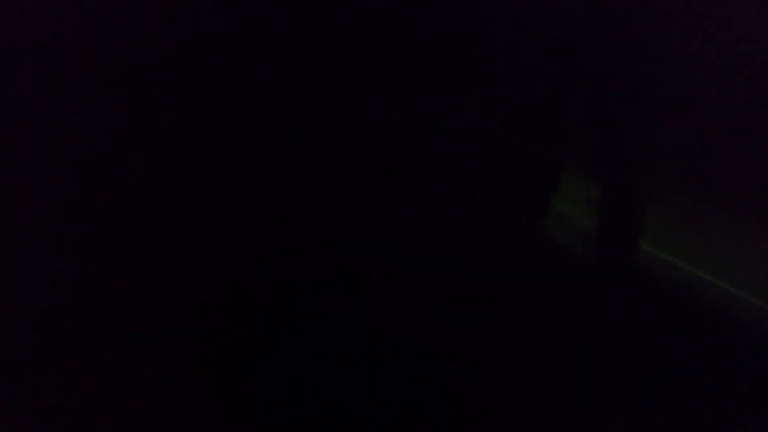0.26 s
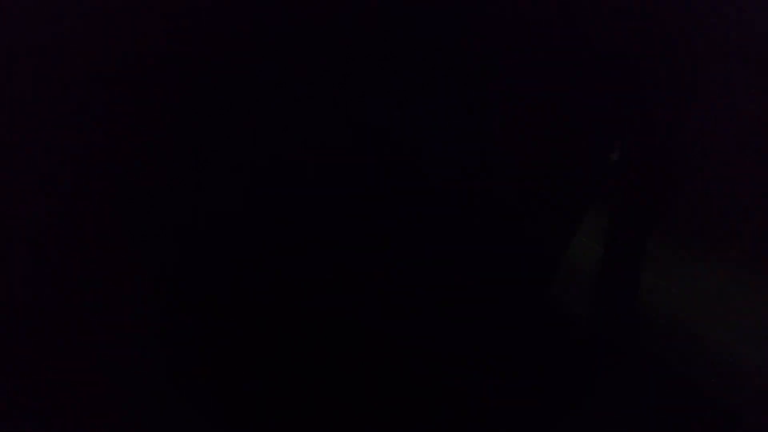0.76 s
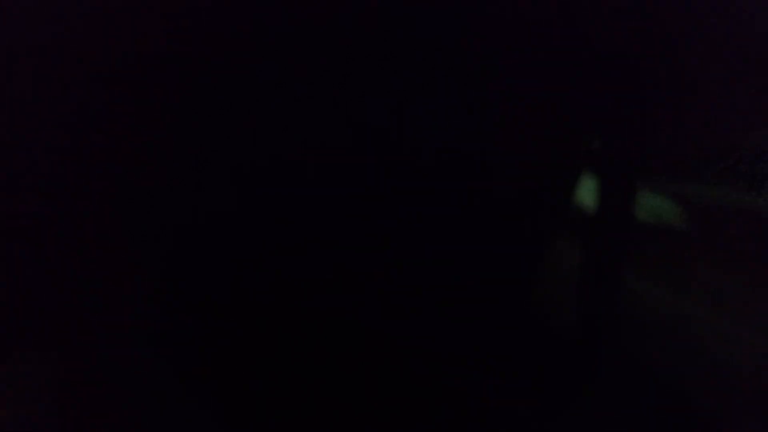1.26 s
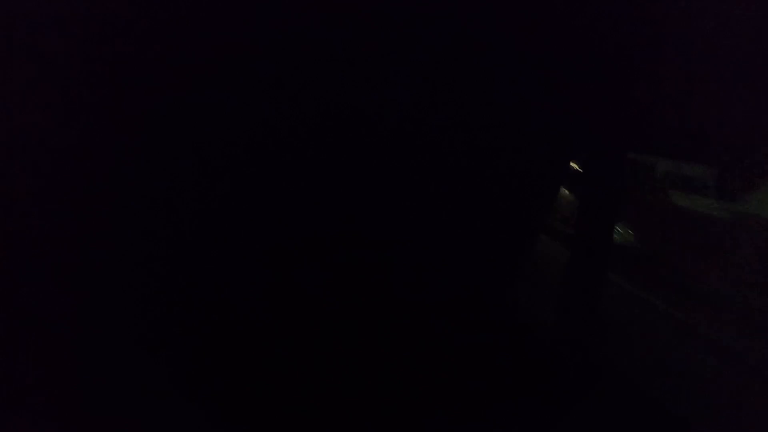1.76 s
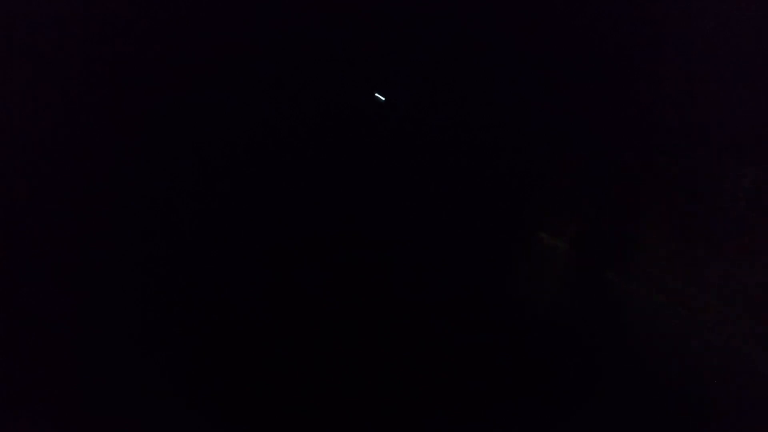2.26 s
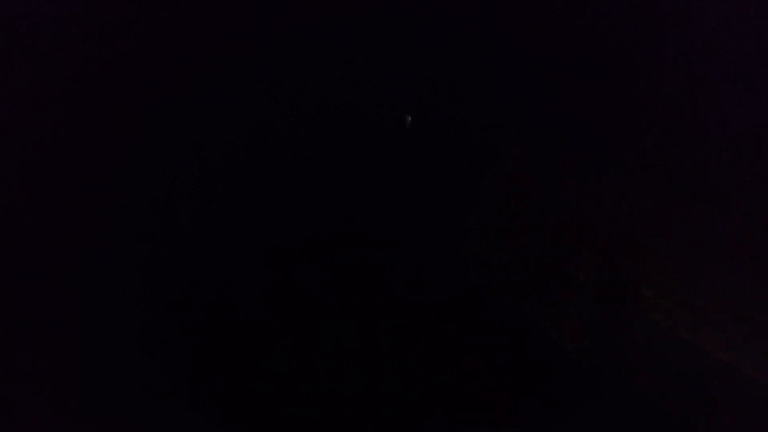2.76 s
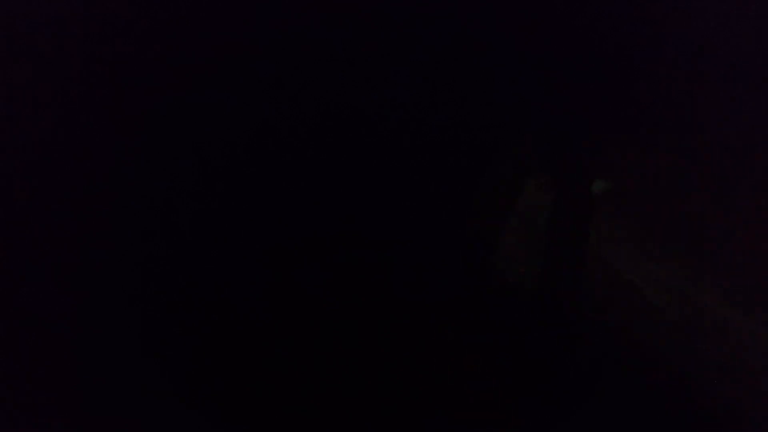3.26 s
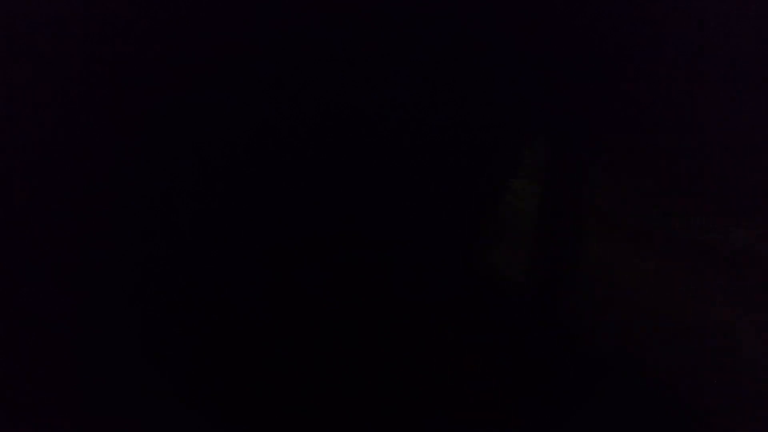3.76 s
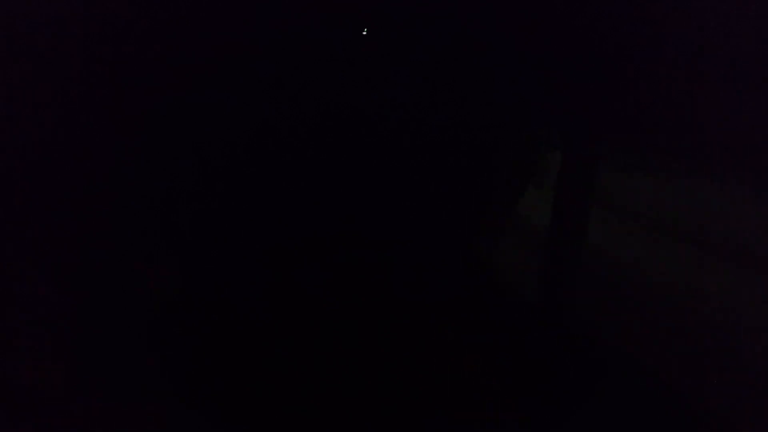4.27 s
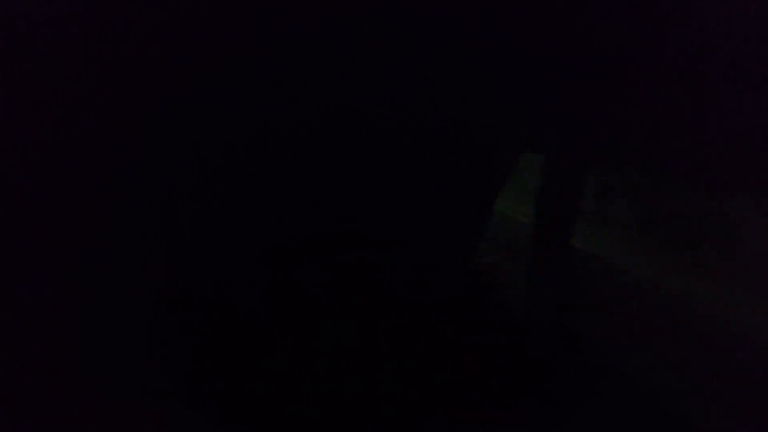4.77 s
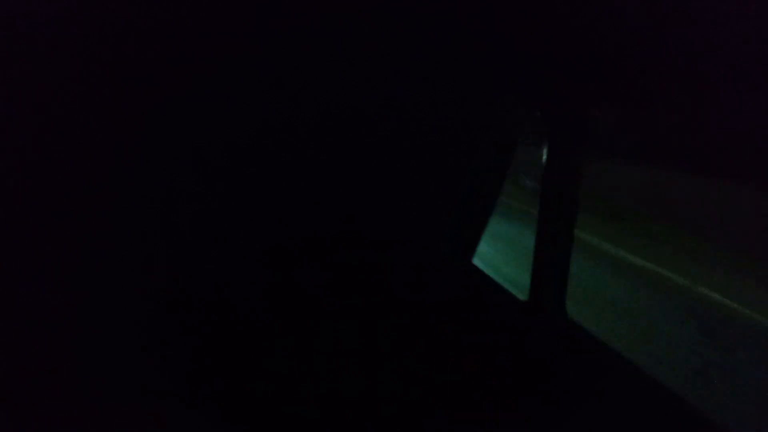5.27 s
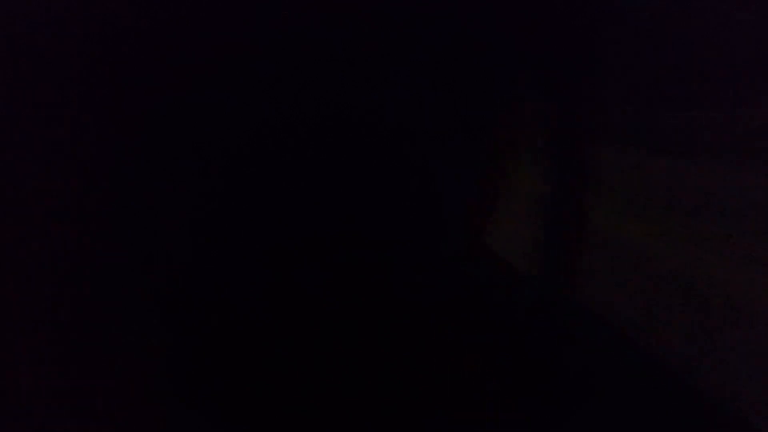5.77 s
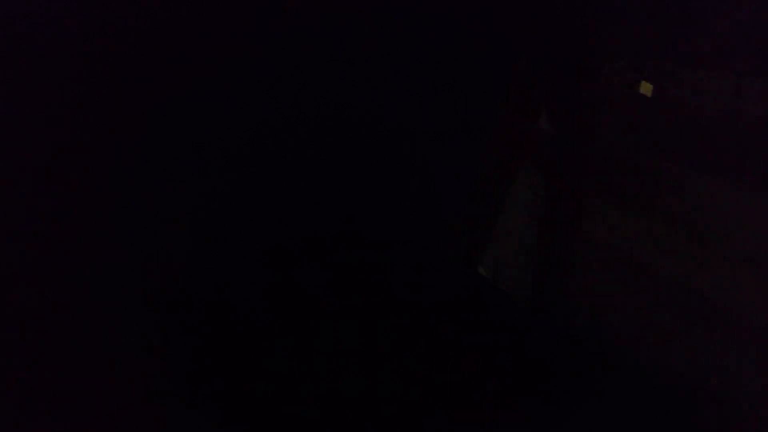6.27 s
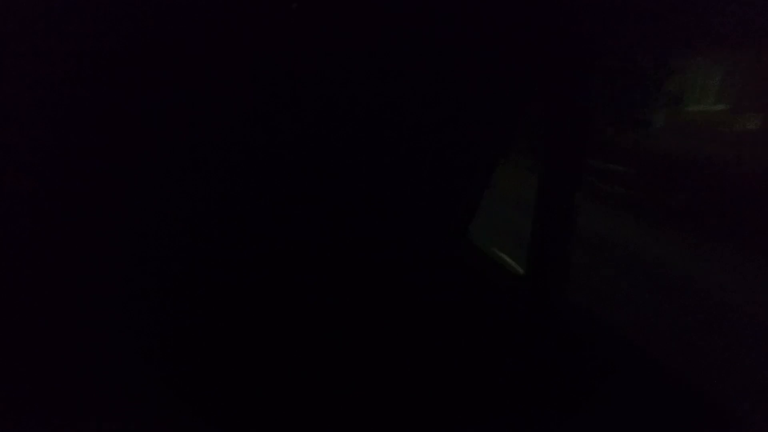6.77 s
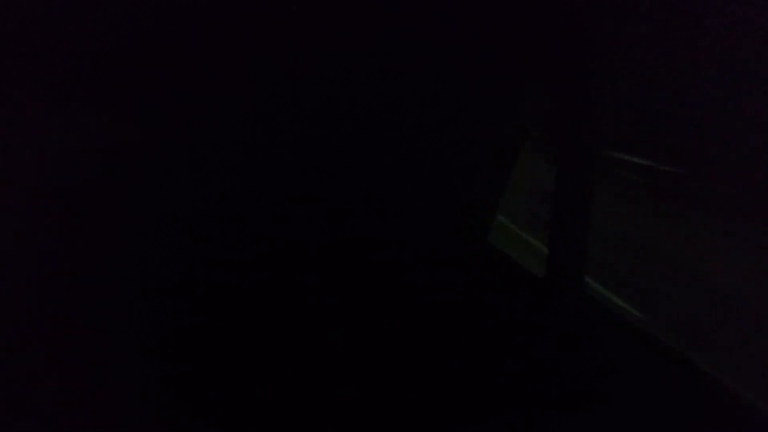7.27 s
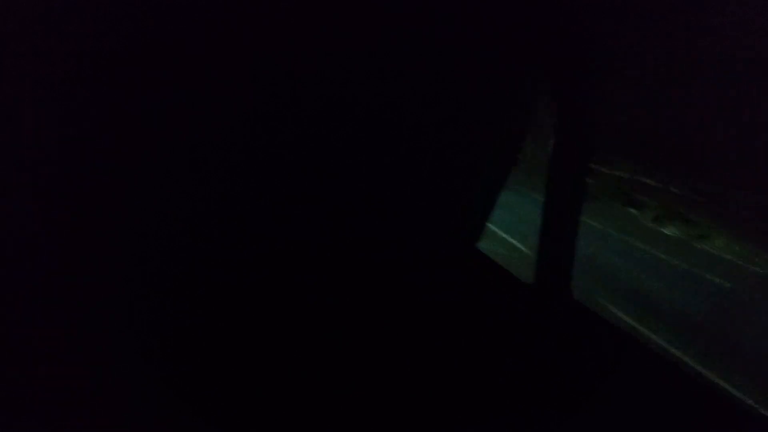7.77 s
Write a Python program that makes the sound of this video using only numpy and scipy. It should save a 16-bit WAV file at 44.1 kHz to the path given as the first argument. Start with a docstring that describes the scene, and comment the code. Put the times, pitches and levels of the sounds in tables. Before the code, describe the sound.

Stereo cabin microphone in a rattly minibus on uneven road. Deep uneven booms dominate, with low panel drumming, floor thumps and dull roar from the tyres. A brief airy rush passes early; then loose plastic and metal parts clatter in irregular clusters, with dull knocks and faint bright jingles. Around two thirds through it calms to mostly rumble, before rough road brings the clatter back until the end.

```python
"""Inside a minibus on a rough road. From the start, low drumming, tyre roar, trim buzz and tick-like rattles
are shaped noise, while bumps make the cabin boom and panels drum in wavering notes; hiss rushes up within
the first second. Dull knocks (from 0.3 s) and floor thumps (from 0.4 s) join in, then loose trim rattles
(from 0.7 s) in bursts of buzz and ringing. From 2.2 s small metal parts jingle in bursts of very high noise.
Rattles and jingles pause from about 5.4 s and return after 6.6 s."""
import sys
import numpy as np
from scipy import signal
from scipy.fft import rfft, irfft
from scipy.io import wavfile
from scipy.ndimage import uniform_filter1d

SR = 44100
rng = np.random.default_rng(int(sys.argv[2]) if len(sys.argv) > 2 else 0)


def wav_record(signal):
    """Record a signal, one row per channel, as 16-bit PCM in the file named by sys.argv[1]."""
    frames = np.transpose(np.atleast_2d(signal))
    bounded = np.clip(frames, -1, 1)
    # unit amplitude maps onto the largest positive 16-bit level
    quanta = np.round(bounded * 32767).astype(np.int16)
    wavfile.write(sys.argv[1], SR, quanta)


N = 353241
T = np.arange(N) / SR  # time of each sample, s
HZ = np.fft.rfftfreq(N, 1 / SR)
CREST_DB = 2  # level step between the listed levels of short bursts and their envelopes


def undb(db):
    """Turn decibels into an amplitude factor."""
    return 10 ** (np.asarray(db) / 20)


def unit(x):
    """Scale to an average (RMS) level of 1."""
    return x / np.sqrt(np.mean(x ** 2))


def curves(table):
    """Draw straight lines through a table's points in time, one curve per column."""
    s, *columns = np.transpose(table)
    return [np.interp(T, s, c) for c in columns]


def along_hz(table, grid=HZ):
    """Draw a table's values over pitch, with the pitch on a logarithmic scale."""
    hz, value = np.transpose(table)
    return np.interp(np.log(grid + 1), np.log(hz + 1), value)


# How alike left and right are, limited to -1 (opposite) to 1 (same): (frequency [Hz], likeness [no unit])
LIKENESS = [(40, 1.5), (130, 5.5), (250, 1.3), (400, 0.5), (600, 0.03), (1300, -0.11), (3000, -0.04),
            (15000, -0.02)]


def noise(gain):
    """Two-channel noise of the given spectrum: the bass is shared, the treble differs."""
    like = np.clip(along_hz(LIKENESS), -1, 1)
    mid, side = rfft(rng.standard_normal((2, N)))
    mid = mid * np.sqrt(1 + like)
    side = side * np.sqrt(1 - like)
    return unit(irfft(np.array([mid + side, mid - side]) * gain, N))


def resonance(hz, width_hz):
    """A peak of height 1 around hz; width_hz is its width at half height."""
    return 1 / (1 + ((HZ - hz ** 2 / (HZ + 1)) / width_hz) ** 2)


def walk(rate):
    """Random levels, rate of them per second, joined by slopes; spread 1."""
    hold = int(SR / rate)
    steps = np.repeat(rng.standard_normal(N // hold + 1), hold)
    return unit(uniform_filter1d(steps, hold)[:N])


def blow(t60, rise):
    """Loudness shape of a blow: a quick rise, then a fade by 60 dB per t60 seconds."""
    t = np.arange(int(0.27 * SR)) / SR
    return (1 - np.exp(-t / rise)) * np.exp(-np.log(1000) * t / t60)


def swell(length, rise):
    """Rise, hold, fade: length is the time between the two half heights."""
    t = np.arange(int((length + rise) * SR)) / SR
    ramp = np.minimum(t, length + rise - t) / rise
    return np.sin(np.pi / 2 * np.clip(ramp, 0, 1)) ** 2


def add(out, s, sound):
    """Mix a sound in at second s."""
    i = int(s * SR)
    out[..., i:i + sound.shape[-1]] += sound[..., :N - i]


def chatter(per_s, spread_db, t60):
    """Envelope of many tiny contacts of uneven but bounded size, each with a short tail."""
    happens = rng.random(N) < per_s / SR
    size = happens * undb(spread_db * np.minimum(rng.exponential(size=N), 3))
    return unit(signal.lfilter([1], [1, -np.exp(-np.log(1000) / (t60 * SR))], size))


def ring(hz, width_share, shape):
    """A rough ring: a burst of noise through a steep resonance, unrelated left and right."""
    edges = [hz * (1 - width_share), hz * (1 + width_share)]
    band = signal.butter(2, edges, "band", fs=SR, output="sos")
    rough = signal.sosfilt(band, rng.standard_normal((2, 2 * len(shape))))
    return unit(rough[:, len(shape):]) * shape  # the second half, once the filter has settled


def surges(table, rise, waver, flicker_db):
    """Notes that swell up and fade while their pitch wavers and their level flickers."""
    out = np.zeros(N)
    wander = 1 + waver * walk(30)
    flicker = undb(flicker_db * walk(40))
    warped_s = np.cumsum(wander) / SR  # time that runs faster and slower, to bend the pitch
    for (s, length, db, hz), start in zip(table, rng.random(len(table))):
        shape = swell(length, rise)
        i = max(int((s - rise / 2) * SR), 0)
        part = warped_s[i:i + len(shape)]
        tone = np.sin(2 * np.pi * (hz * part + start))
        out[i:i + len(shape)] += undb(db) * shape[:len(part)] * tone
    return np.sqrt(2) * flicker * out  # levels count as RMS


# Roughness of the road: (time [s], panel drumming level [dB], axle and floor level [dB])
ROAD = [(0.0, -21, -28), (0.58, -16.5, -26), (0.62, -14.5, -43), (0.76, -15, -22.5), (0.89, -17, -34),
        (1.2, -21, -28.5), (2.27, -15, -25), (2.85, -17.5, -23.5), (3.06, -19.5, -25.5), (3.79, -13.5, -20),
        (3.95, -16.5, -24), (4.06, -20, -22.5), (4.62, -15, -23.5), (4.95, -18.5, -27), (6.38, -21.5, -27),
        (6.4, -20.5, -33), (6.8, -16, -23.5), (7.16, -14.5, -24.5), (7.39, -14, -14.5), (7.49, -16, -27),
        (7.92, -18, -21.5), (8.01, -11.5, -18)]
# Ways the panels like to shake: (frequency [Hz], width [Hz], level [dB])
PANELS = [(151.2, 88, -5), (211, 47, -4.5), (242.8, 28.5, -0.5), (276.6, 51, -4), (330.4, 38, -11),
          (371.8, 37.7, -12.5)]
THUD_DB, FLOOR_DB = 0, 3  # relative to the axle and floor level
HUM_DB, PANEL_DB = -9, -1  # relative to the panel drumming level


def road():
    """The road surface shakes axle, floor, cabin air and panels, each humming around its own low pitches."""
    panel_db, axle_db = curves(ROAD)
    lumps = undb(2 * walk(7.6))  # the surface is uneven from moment to moment
    thud = noise(resonance(65.3, 42)) * undb(THUD_DB)
    floor = noise(resonance(122.4, 23) + 0.69 * resonance(95, 57)) * undb(FLOOR_DB) * lumps
    hum = noise(resonance(95, 16)) * undb(HUM_DB)  # the cabin air between the surges
    panel_power = sum((undb(db) * resonance(hz, width)) ** 2 for hz, width, db in PANELS)
    panels = noise(np.sqrt(panel_power)) * undb(PANEL_DB)
    return (thud + floor) * undb(axle_db) + (hum + panels) * undb(panel_db)


# Tyre roar through the shell, loudest on rough patches: (time [s], level [dB])
SHELL = [(0.0, -33), (0.04, -35.5), (0.94, -31), (1.07, -37.5), (1.45, -33), (1.69, -37), (2.23, -30.5),
         (2.77, -28.5), (2.88, -38.5), (3.84, -29), (4.01, -36.5), (4.44, -29), (4.5, -31.5), (4.55, -33),
         (4.71, -39.5), (4.73, -29.5), (4.86, -28), (4.89, -34), (5.51, -37), (6.11, -37.5), (6.2, -34),
         (6.38, -36), (6.8, -28.5), (6.94, -34), (7.09, -29), (7.23, -34), (7.3, -26.5), (7.32, -30),
         (7.72, -30.5), (7.74, -36.5), (7.99, -30), (8.01, -50)]
# Colour of the roar: (frequency [Hz], relative level per Hz [dB])
ROAR = [(220, -32.5), (380, -20.5), (406, -5), (505, -7.5), (564, -12), (622, -9.5), (679, -11),
        (717, -11.5), (985, -12.5), (1250, -21.5), (1860, -22.5), (2340, -30), (4040, -44.5), (5200, -46),
        (6760, -75.5), (11400, -120)]


def tyre_roar():
    """Tyre noise comes through the shell, with a fast uneven flicker."""
    return noise(undb(along_hz(ROAR))) * undb(1.4 * walk(25)) * undb(curves(SHELL)[0])


def draught():
    """A faint steady band of air noise, as from a window seal."""
    return undb(-65) * noise(resonance(4100, 440))


# Steady treble, with one long rush in the first second: (time [s], trim buzz level [dB], hiss level [dB])
TREBLE = [(0, -47.5, -72), (.19, -48, -61), (.25, -44.5, -48.5), (.4, -41.5, -43.5), (.54, -39, -42),
          (.62, -44, -48), (.7, -44, -48.5), (.8, -36, -44.5), (.92, -45.5, -50), (.98, -63, -61.5),
          (1.18, -51, -73.5), (1.4, -49, -62), (1.65, -51, -64), (2.1, -50, -58), (2.61, -56, -58),
          (2.85, -47.5, -58.5), (3.26, -49.5, -67), (3.77, -55, -59), (3.92, -45, -56), (4.19, -56, -61.5),
          (4.53, -44, -59), (4.77, -55, -61.5), (5.17, -54, -68), (5.96, -52.5, -68.5), (6.67, -48, -60),
          (7.27, -54, -60.5), (7.56, -54.5, -61), (8.01, -59, -63)]
# Colour of buzzing trim: (frequency [Hz], relative level per Hz [dB])
BUZZ = [(760, -34.5), (1300, 0), (1700, -5.5), (2050, -2), (2280, -8), (2980, -10), (4010, -13),
        (5240, -22.5), (7160, -21.5), (8880, -36.5), (11000, -38), (14300, -61.5), (22000, -120)]


def trim():
    """Loose trim buzzes in quick contacts."""
    contacts = unit(1.6 + 0.44 * chatter(250, 2.3, 0.27))
    return noise(undb(along_hz(BUZZ))) * contacts * undb(curves(TREBLE)[0])


def ticks():
    """Small sharp rattles fall by chance, louder on rough patches."""
    low_cut = 1 + (3000 / (HZ + 1)) ** 4
    sharp = noise(undb(along_hz(BUZZ)) / low_cut)
    level_db = curves(SHELL)[0] - 26.5  # relative to the roar
    return sharp * chatter(35, 2., 0.09) * undb(level_db)


# Puffs of tyre hiss thrown back by things along the roadside: (start [s], length [s], level [dB])
PUFFS = [(1.203, 0.098, -57.5), (1.292, 0.12, -63.5), (1.56, 0.04, -63), (1.817, 0.042, -57),
         (1.9, 0.16, -64), (2.108, 0.13, -57), (2.435, .03, -41.5), (2.603, 0.15, -56), (3.234, .04, -69),
         (3.563, 0.024, -58), (3.663, 0.022, -56), (3.77, 0.12, -55), (4.035, 0.025, -71),
         (4.322, 0.23, -63), (4.74, .09, -60), (4.85, .03, -58), (5.16, 0.045, -66), (5.516, 0.057, -65),
         (5.676, .05, -61), (5.945, 0.045, -60), (6.123, 0.03, -57), (6.429, 0.047, -48.5),
         (6.55, 0.033, -52), (6.9, .03, -66), (7.0, .04, -60), (7.143, 0.022, -64), (7.4, .12, -60),
         (7.655, 0.044, -62)]
# Colour of the hiss: (frequency [Hz], relative level per Hz [dB])
HISS = [(3240, -25.5), (5500, -2), (5970, -3.5), (7300, 1), (8390, -9), (10800, -10), (12900, -6),
        (15600, -7)]
PUFF_RISE_S = 0.051


def roadside():
    """Soft puffs and swells of hiss come through the window gaps."""
    envelope = undb(curves(TREBLE)[1])
    for s, length, db in PUFFS:
        add(envelope, s - PUFF_RISE_S / 2, undb(db) * swell(length, PUFF_RISE_S))
    contacts = unit(1.25 + 0.12 * chatter(90, 3.5, .04))
    flicker = contacts * undb(1.3 * walk(25) + 0.64 * walk(8))
    return noise(undb(along_hz(HISS))) * flicker * envelope


# Bumps that make the cabin boom: (start [s], length [s], level [dB], pitch [Hz])
BOOMS = [(.075, .03, -14.5, 102.4), (.141, .075, -16.5, 93.8), (.39, .043, -22.5, 104.8),
         (.454, .22, -16, 96.1), (.76, .2, -10.5, 93.7), (.97, .16, -8.5, 96.6), (1.193, .081, -18.5, 99.4),
         (1.311, .23, -16, 92.9), (1.612, 0.052, -21, 115), (1.718, .038, -17.5, 109),
         (1.762, 0.056, -22, 91.3), (1.908, .072, -14, 98.2), (2.021, 0.11, -11.5, 95.6),
         (2.171, .094, -15.5, 108.6), (2.349, 0.11, -13.5, 86.3), (2.5, .071, -18, 84),
         (2.692, .1, -12.5, 89.4), (2.82, .058, -13.5, 96.7), (2.891, 0.044, -19, 96.4),
         (2.955, .04, -18, 101), (3.235, 0.029, -19, 92.9), (3.418, .081, -17, 90.2),
         (3.532, .089, -14, 114.2), (3.658, 0.072, -13, 87.4), (3.778, 0.12, -12, 91.9),
         (3.916, .085, -12.5, 95), (4.051, 0.079, -13, 97.5), (4.212, .036, -14.5, 96.7),
         (4.284, .075, -15, 101), (4.374, .21, -12, 92.8), (4.6, .085, -10, 89), (4.717, .07, -12.5, 90.3),
         (4.863, .15, -13, 98.5), (5.086, .05, -14.5, 95.4), (5.264, .09, -13.5, 98.4),
         (5.428, 0.098, -15, 97.4), (5.661, 0.079, -23, 108.9), (5.982, .048, -19.5, 90.3),
         (6.252, .18, -17.5, 90.3), (6.455, .076, -15, 102.7), (6.646, 0.2, -15.5, 94),
         (6.87, .078, -10.5, 96.8), (7.038, .043, -13, 106), (7.135, .149, -11.5, 92.9),
         (7.295, 0.1, -14, 94.1), (7.393, .065, -10.5, 82.1), (7.477, .091, -11.5, 86),
         (7.594, .057, -15.5, 84.9), (7.84, .085, -10.5, 98)]


def booms():
    """Bumps set the air in the cabin swinging: deep notes that swell and fade."""
    return surges(BOOMS, rise=.03, waver=.045, flicker_db=0.9)


# Bumps that make one panel drum out: (start [s], length [s], level [dB], pitch [Hz])
DRUMS = [(.163, .035, -17, 235), (.788, .025, -15.5, 234), (.85, .08, -18, 222), (.952, .06, -16.5, 210),
         (2.017, .058, -14.5, 216), (2.126, .036, -14, 253), (2.238, .041, -16.5, 217),
         (2.338, .04, -14, 250), (2.453, .025, -14, 224), (2.6, .03, -19.5, 256), (3.534, .054, -16.5, 219),
         (3.676, .068, -16, 215), (3.786, .04, -17.5, 236), (4.295, .03, -14, 207.5),
         (4.38, .042, -17, 198), (4.446, .026, -14, 220), (4.56, .05, -11, 221), (4.615, .085, -10.5, 203),
         (4.768, 0.042, -13.5, 232), (4.813, .045, -14.5, 190), (4.95, .04, -17.5, 180),
         (6.682, .028, -15.5, 234), (6.926, .04, -17.5, 233.5), (7.108, 0.029, -18, 249),
         (7.2, .08, -18, 218), (7.301, .066, -15.5, 233), (7.361, .04, -17, 205), (7.446, 0.066, -17, 200),
         (7.502, .04, -16.5, 242)]


def drums():
    """Bumps make single panels sound out in short notes with a quicker rise."""
    return surges(DRUMS, rise=.015, waver=0.03046, flicker_db=0.42)


# Dull knocks in the panels: (time [s], peak level [dB], pitch [Hz])
KNOCKS = [(0.309, -30, 616.3), (0.506, -26.5, 614), (0.745, -43, 684), (1.385, -27, 613), (2.186, -20, 780),
          (2.306, -26, 660), (2.753, -32.5, 1010), (2.968, -27, 643), (3.287, -24, 670), (3.498, -39, 630),
          (3.543, -27, 1000), (3.612, -25.5, 676), (3.797, -22.5, 622), (3.886, -28.5, 855),
          (4.202, -25.5, 640), (4.47, -38, 768), (4.545, -23, 826), (4.624, -26, 677.2), (5.019, -26, 874),
          (6.18, -23.5, 820), (6.589, -24.5, 840), (6.68, -22.5, 646), (6.964, -28, 620),
          (7.036, -25.5, 840), (7.098, -24.5, 818), (7.256, -25, 650), (7.332, -25, 630), (7.606, -44, 686),
          (7.65, -27, 664), (7.97, -26.5, 624)]


def knocks():
    """Short dull blows on the side panels, each a rough ring that dies away."""
    out = np.zeros((2, N))
    shape = blow(t60=0.17, rise=0.00083)
    for s, db, hz in KNOCKS:
        add(out, s, undb(db - CREST_DB) * ring(hz, .2, shape))
    return out


# Bumps that make the floor thump: (start [s], length [s], level [dB], pitch [Hz])
THUMPS = [(0.402, 0.071, -20.5, 120), (0.632, 0.07, -14, 125), (0.812, 0.104, -21.5, 122),
          (1.037, 0.089, -18.5, 117), (1.416, 0.043, -17.5, 136), (1.589, 0.037, -14, 123),
          (2.028, 0.024, -16, 139), (2.216, 0.23, -16, 124), (2.343, 0.061, -14, 130),
          (2.451, 0.03, -17.5, 128), (2.713, 0.074, -25, 119), (3.294, 0.031, -17, 133),
          (3.563, 0.1, -20.5, 119), (3.765, 0.091, -17, 148), (3.87, 0.138, -18.5, 121),
          (4.112, 0.074, -16, 120), (4.279, 0.134, -17, 120), (4.47, 0.081, -18.5, 133),
          (4.754, 0.041, -17, 141), (4.825, 0.16, -18.5, 142), (5.06, 0.03, -13, 139),
          (5.261, 0.083, -13, 124), (5.432, 0.053, -19, 120), (6.747, 0.29, -18.5, 122),
          (7.157, 0.14, -17, 138), (7.373, 0.14, -21, 120), (7.579, 0.087, -18.5, 122),
          (7.74, 0.048, -19.5, 125), (7.85, 0.033, -25, 117)]


def thumps():
    """Bumps shake the floor into low notes a little above the boom."""
    return surges(THUMPS, rise=.03, waver=0.02995, flicker_db=0.97)


# Rattles; ring levels are raised by CREST_DB when played:
# (time [s], body level [dB], edge level [dB], ring pitch [Hz], ring level [dB])
RATTLES = [(0.723, -38, -39, 5990, -53), (1.389, -43, -43.5, 6530, -53), (1.424, -51, -63, 5010, -62),
           (1.836, -53, -43, 7020, -51), (2.078, -56, -52, 6400, -52), (2.111, -31.5, -40.5, 5685, -55),
           (2.181, -26, -35.5, 3450, -39), (2.215, -37, -44, 7000, -45), (2.249, -33, -39, 4000, -53),
           (2.28, -42, -53, 3900, -53), (2.347, -44, -48, 6050, -49), (2.39, -42, -49, 1900, -39),
           (2.44, -53, -38, 3076, -37.5), (2.625, -28, -33.5, 5160, -41), (2.669, -35, -37, 4700, -41),
           (2.711, -35, -40, 4453, -49), (2.753, -30, -36, 1550, -30), (3.026, -36.5, -58, 7270, -76),
           (3.238, -42, -44, 6150, -55), (3.284, -37.5, -61, 2615, -48), (3.316, -31, -45, 2780, -40),
           (3.392, -44.5, -47.5, 7790, -54), (3.478, -33, -47, 6250, -58), (3.561, -35, -47, 7580, -48),
           (3.579, -40, -56, 2690, -40.5), (3.61, -43, -49, 6800, -54), (3.729, -36, -45, 4470, -60),
           (3.758, -29.5, -40, 7440, -46), (3.788, -31.5, -40, 6190, -51), (3.831, -32, -38.5, 7505, -57),
           (3.898, -31.5, -44, 6200, -46), (4.196, -52, -47, 5775, -55), (4.228, -40, -55, 1810, -42),
           (4.306, -31.5, -45, 6000, -51.5), (4.365, -44, -40.5, 2660, -32), (4.398, -25, -36.5, 4540, -56),
           (4.447, -35, -41, 1650, -36), (4.48, -42, -41.5, 6340, -60), (4.51, -32, -46, 4400, -47),
           (4.547, -35, -46, 5840, -53), (4.574, -52, -54, 2620, -38), (4.621, -34, -50, 6630, -51),
           (4.654, -42, -49.5, 2170, -43), (4.701, -45, -48, 8000, -54), (4.732, -32, -42, 2180, -33.5),
           (4.797, -28, -38, 6550, -46), (4.832, -48, -45, 6310, -56), (4.861, -37, -42.5, 4570, -60),
           (4.944, -37.5, -48, 6500, -59), (5.022, -35, -52, 5730, -61), (5.059, -38, -51, 1790, -45),
           (5.119, -47.5, -64, 1404, -41), (6.65, -49, -45, 1510, -42), (6.682, -34, -43, 6080, -60),
           (6.748, -49, -53, 7200, -49), (6.905, -46, -49, 5910, -54), (6.987, -33.5, -43, 2800, -48),
           (7.063, -35, -52, 1925, -42), (7.31, -44.5, -45, 4870, -55), (7.386, -33, -39, 3402, -42),
           (7.449, -30.5, -43, 7810, -60), (7.484, -36, -48, 7110, -49), (7.528, -35, -42.5, 1974, -37),
           (7.575, -54, -50, 2550, -49), (7.646, -29.5, -36, 7840, -54), (7.689, -44, -42, 1540, -34.5),
           (7.735, -37.5, -48, 6695, -58), (7.778, -40, -47, 6600, -62), (7.873, -39, -46, 2020, -48),
           (7.899, -37.5, -52, 6730, -53), (7.94, -35, -45, 6070, -52), (7.974, -51, -46, 6360, -64)]
RATTLE_T60_S = 0.12
RING_T60_SHARE = 0.5  # rings die sooner than the burst around them
EDGE_HZ = 3880  # a rattle's dull body lies below, its sharp edge above


def rattles():
    """Each rattle is a burst of buzz, dull or sharp, plus a ring at the pitch of the part that strikes."""
    out, body, edge = np.zeros((2, N)), np.zeros(N), np.zeros(N)
    burst = blow(RATTLE_T60_S, 0.0041)
    short = blow(RATTLE_T60_S * RING_T60_SHARE, 0.0014)
    pans_db = 3.5 + 2.5 * rng.standard_normal(len(RATTLES))  # left minus right, mostly to the left
    for (s, body_db, edge_db, hz, ring_db), pan_db in zip(RATTLES, pans_db):
        add(body, s, undb(body_db) * burst)
        add(edge, s, undb(edge_db) * burst)
        sides_db = np.array([[pan_db], [-pan_db]]) / 2
        add(out, s, undb(ring_db + CREST_DB + sides_db) * ring(hz, 0.044, short))
    colour = undb(along_hz(BUZZ))
    high = 1 / (1 + (EDGE_HZ / (HZ + 1)) ** 6)
    return out + body * noise(colour * (1 - high)) + edge * noise(colour * high)


# Jingles: (time [s], peak level [dB])
JINGLES = [(2.1816, -51), (2.3476, -45), (2.4399, -42), (2.6241, -40), (2.6706, -39), (2.7536, -47),
           (3.1103, -52), (3.5638, -55), (3.7334, -41), (3.782, -27.5), (3.8452, -41), (4.3091, -51.5),
           (4.4789, -49), (4.6621, -42.5), (4.7402, -30.5), (4.8054, -33), (4.8609, -40), (7.3831, -49),
           (7.653, -39), (7.8765, -52)]
# Colour of the jingles: (frequency [Hz], relative level per Hz [dB])
JINGLE = [(5290, -58), (9000, -20.5), (10900, -14), (12500, 2), (13500, 3.5), (15100, 3), (15600, -5)]


def jingles():
    """Small metal parts touch: their dense, very high rings are bursts of noise."""
    envelope = np.zeros(N)
    shape = blow(t60=0.057, rise=.001)
    for s, db in JINGLES:
        add(envelope, s, undb(db - CREST_DB) * shape)
    return envelope * noise(undb(along_hz(JINGLE)))


def scene():
    """Everything heard in the cabin, added together."""
    steady = road() + tyre_roar() + draught() + trim() + ticks() + roadside()
    return steady + booms() + drums() + knocks() + thumps() + rattles() + jingles()


# Difference in colour of the two microphones: (frequency [Hz], left minus right level [dB])
TILT = [(40, 3), (110, 0.1), (200, -1), (380, -4), (700, -0.5), (1290, 4), (2380, 4), (4400, -4), (6500, 3),
        (9000, -8.5), (12500, -7.5), (15500, -0.5)]
LEFT_LAG_S = 0.00018  # the bass reaches the right microphone first
LOW_CUT_HZ, TOP_HZ = 36, 15790


def record(dry):
    """The microphones differ in colour and lose the deepest bass; the loudest peaks are rounded, the top is cut."""
    margin = SR // 10  # mirrored sound at both ends keeps the filters from disturbing the edges
    wide = np.pad(dry, ((0, 0), (margin, margin)), "reflect")
    hz = np.fft.rfftfreq(wide.shape[1], 1 / SR)
    tilt_db = along_hz(TILT, hz)
    lag = np.exp(-1j * np.pi * np.minimum(hz, 300) * LEFT_LAG_S)  # half the lag on each side
    low_cut = hz ** 2 / np.sqrt(hz ** 4 + LOW_CUT_HZ ** 4)
    colour = low_cut * np.array([undb(tilt_db / 2) * lag, undb(-tilt_db / 2) / lag])
    wet = irfft(rfft(wide) * colour, wide.shape[1])
    wet = wet / (1 + np.abs(wet / 1.05) ** 8) ** (1 / 8)  # rounds peaks near full level
    top_cut = signal.ellip(16, .5, 90, TOP_HZ, fs=SR, output="sos")
    return signal.sosfilt(top_cut, wet)[:, margin:-margin]


dry = scene()
out = record(dry)
wav_record(out)
```